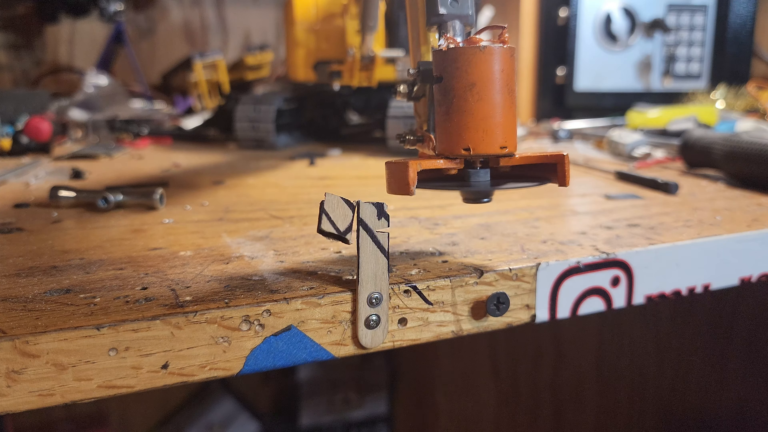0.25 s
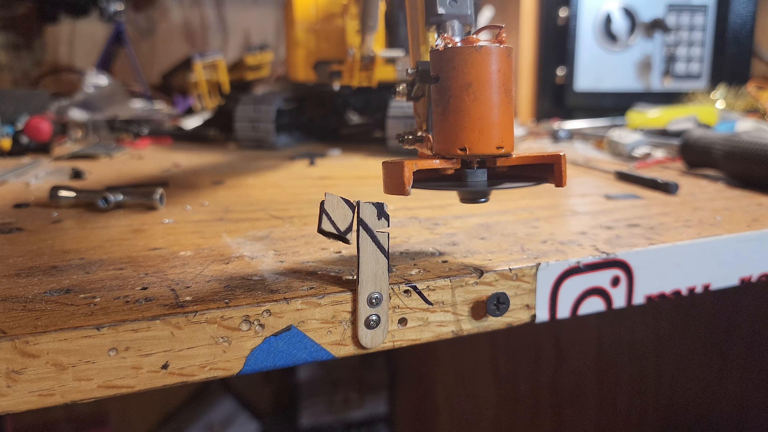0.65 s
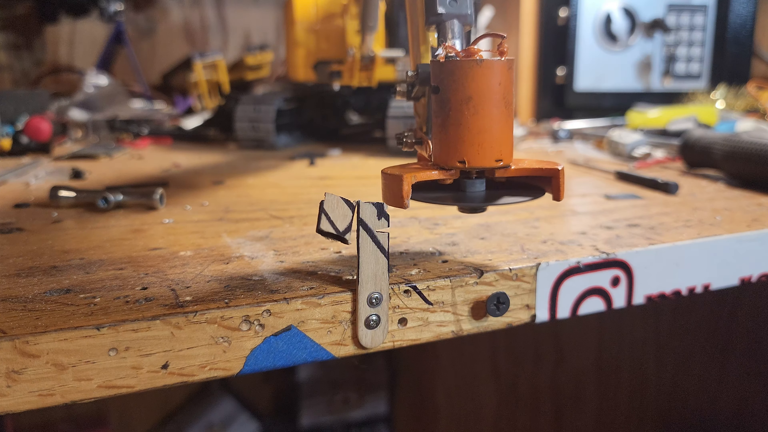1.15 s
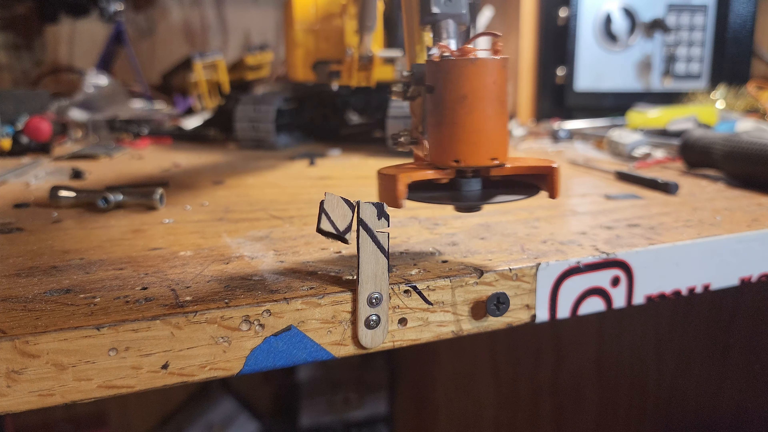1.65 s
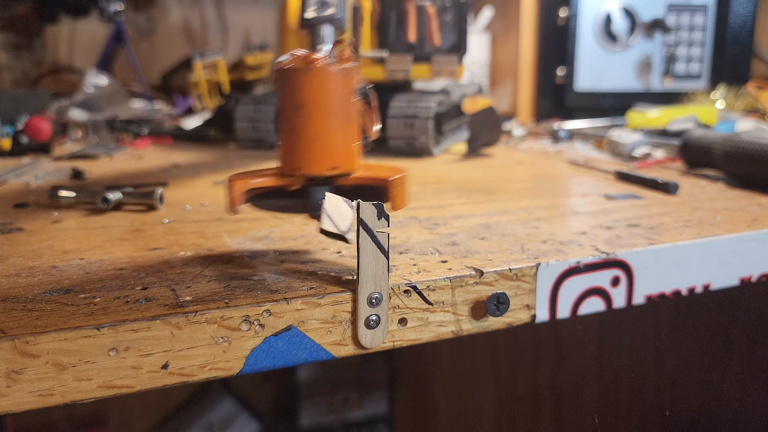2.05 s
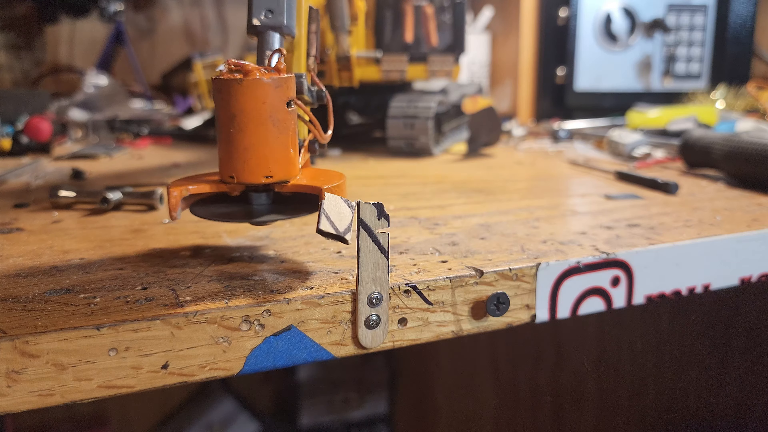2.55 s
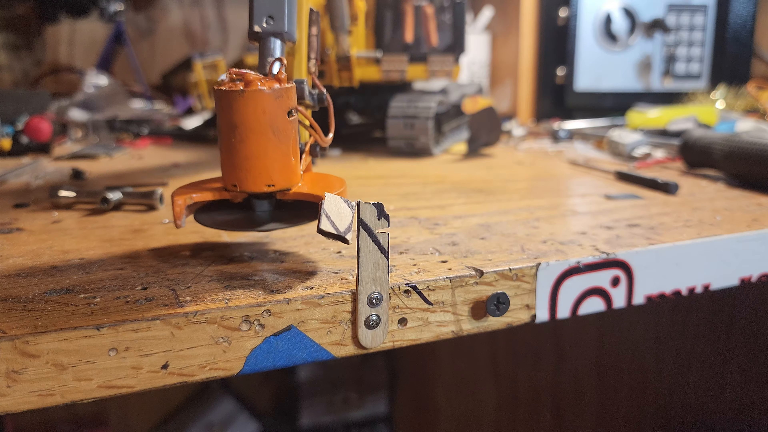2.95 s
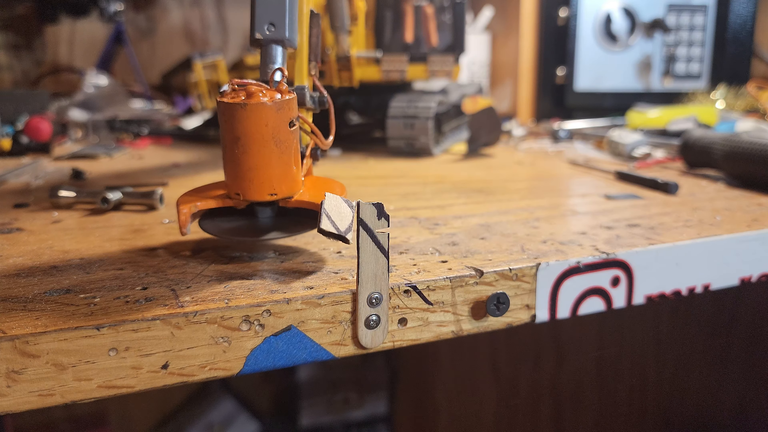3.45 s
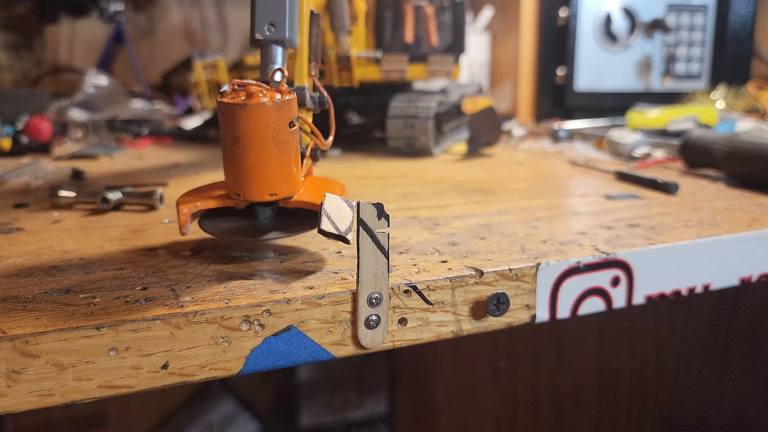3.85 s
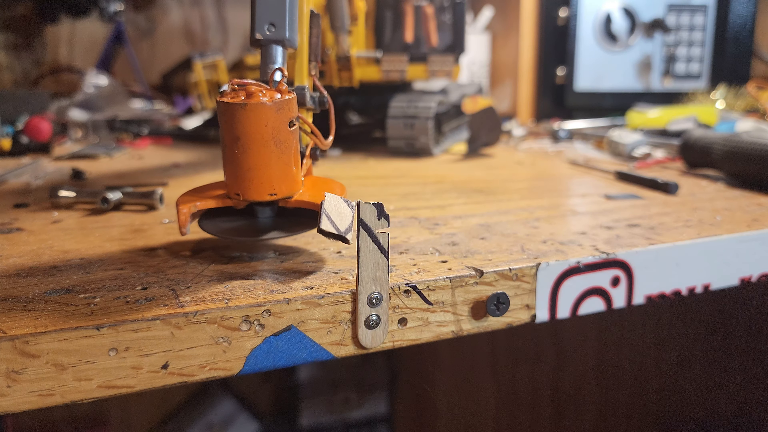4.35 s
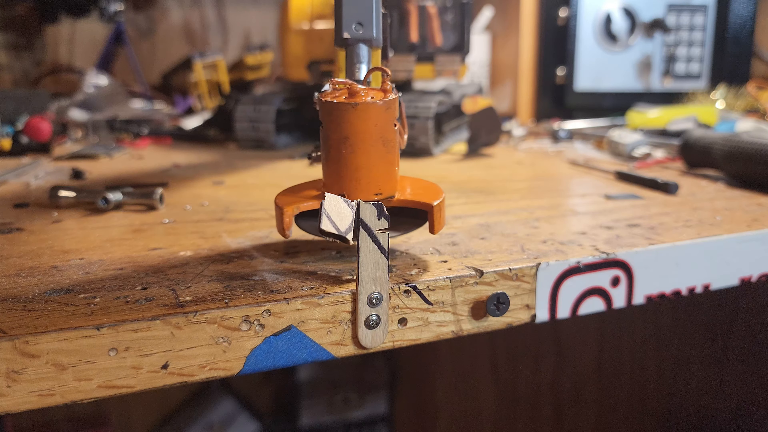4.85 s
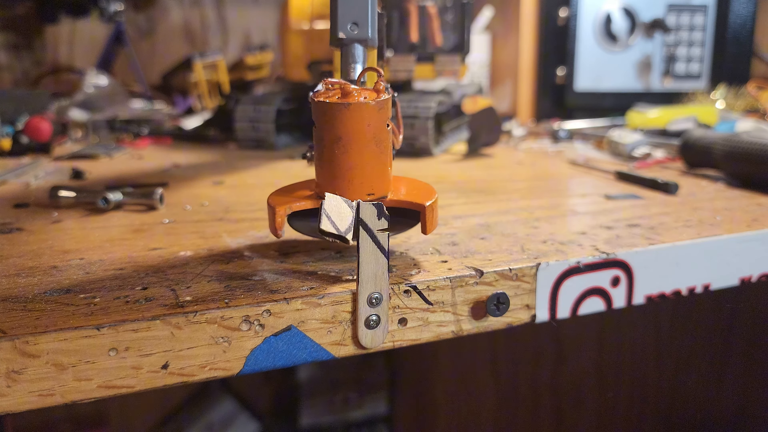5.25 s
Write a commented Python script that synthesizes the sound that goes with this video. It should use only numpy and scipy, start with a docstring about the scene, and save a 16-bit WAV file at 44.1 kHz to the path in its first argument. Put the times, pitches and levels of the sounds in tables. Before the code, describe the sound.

A small electric motor spins up to a high, hissing whine, its disc briefly squeals and judders against wood, then it runs on.

```python
"""First come tiny ticks and chirps, then a rising whine: a small electric motor spins up a cutting disc
on a toy arm above a wooden bench. Its wobbling shaft whines and its brushes (sliding contacts) hiss.
Near 2 s the disc grazes a wooden stick, which squeals once a turn and then shudders. The motor recovers
and runs on while the arm swings about, so whine and hiss change colour. A workshop rumbles below."""
import sys
import numpy as np
from scipy import signal
from scipy.fft import rfft, irfft, next_fast_len
from scipy.io import wavfile

SR = 44100
rng = np.random.default_rng(int(sys.argv[2]) if len(sys.argv) > 2 else 0)


def wrap_up_sound(samples):
    """Save the sound to the file named by the first command line argument, as 16-bit audio."""
    columns = np.atleast_2d(samples).T
    # keep every value between -1 and 1, then stretch to whole-number steps
    tamed = np.clip(columns, -1, 1)
    steps = np.round(tamed * 32767).astype(np.int16)
    wavfile.write(sys.argv[1], SR, steps)


N = 242991
TIME = np.arange(N) / SR


def amp(db):
    """Turn decibels into a gain."""
    return 10 ** (np.asarray(db) / 20)


def rms_one(x):
    """Scale a signal to an average power of 1."""
    return x / np.sqrt(np.mean(x ** 2) + 1e-20)


def in_time(rows):
    """Join a table's rows into curves over time, one for each column."""
    times, *columns = np.transpose(rows)
    return [np.interp(TIME, times, column) for column in columns]


def at_hz(rows, hz, *outside):
    """Read a table's columns at the given frequencies, joining the rows on a pitch scale."""
    points_hz, *columns = np.transpose(rows)
    return [np.interp(np.log(hz + 1), np.log(points_hz), column, *outside) for column in columns]


def sides(pan_db):
    """Left and right gains that keep the total power; positive is to the left."""
    gains = amp(np.array([pan_db / 2, -pan_db / 2]))
    return gains / np.sqrt(np.mean(gains ** 2, axis=0))


def drift(rate_hz):
    """A smooth random wobble, about 1 in size."""
    pole = np.exp(-80 * np.pi * rate_hz / SR)
    slow = signal.lfilter([1], [1, -2 * pole, pole * pole], rng.standard_normal(N // 40 + 2002))[2000:]
    return np.interp(np.arange(N) / 40, np.arange(len(slow)), rms_one(slow - slow.mean()))


def bell(x, centre, width):
    """A smooth bump of height 1."""
    return np.exp(-((x - centre) / width) ** 2)


def since(start_s):
    """Seconds gone by since a moment; 0 before it."""
    return np.maximum(TIME - start_s, 0)


def held(start_s, end_s, rise_db_per_s, fall_db_per_s):
    """A level that stays at 0 dB between two times and slopes away on both sides."""
    early_s = np.maximum(start_s - TIME, 0)
    return np.maximum(-rise_db_per_s * early_s - fall_db_per_s * since(end_s), -150)


def resonate(x, modes):
    """Let a signal ring an object's natural tones, added with alternating signs."""
    out = 0
    for k, (hz, width_hz, level_db) in enumerate(modes):
        pole = np.exp(-np.pi * width_hz / SR)
        feedback = [1, -2 * pole * np.cos(2 * np.pi * hz / SR), pole * pole]
        ring = signal.lfilter(np.array([1, 0, -1]) * (1 - pole * pole) / 2, feedback, x + 1e-18)
        out = out + (-1) ** k * amp(level_db) * ring
    return out


# Where the arm is: t/s, swung left/0-1, raised/0-1, drawn back/0-1
ARM_POSITION = [(0, 0, 0.51, 0.15), (1.65, 0.19, 0, 0.35), (2.2, 0.72, 0.61, 0.4), (2.6, 1, 1, 0.14),
                (3.2, 0.93, 0, 0.1), (4.55, 0.85, 0, 0.062), (4.9, 0.74, 0.34, 0.58), (5.51, 0.82, 0, 0.96)]
# How noise reaches the two sides: f/Hz, likeness/0-1, left's lead with arm right/rad, with arm left/rad
STEREO_LIKENESS = [(60, .96, 0, 0), (130, .88, 0, 0), (300, .7, .1, .1), (500, .55, .3, .8),
                   (860, .65, .8, 1.1), (1380, .5, .3, .6), (1810, .65, 2.6, 3.1), (2250, .4, 2.2, 3),
                   (2800, .62, 2.9, 3.1), (3360, .35, 2.2, 2.8), (3800, .25, 2.2, 6.5),
                   (4300, .5, 2.5, 9.4), (5510, .3, 2.4, 14.2), (6500, .3, 2.4, 14), (7200, .35, 4, 12.4),
                   (8000, .35, 5.9, 10.7), (8600, .5, 6.8, 11.7), (9400, .3, 6.3, 12.8),
                   (10300, .3, 8.6, 15), (11500, .3, 14, 22), (13000, .25, 25, 33), (16000, .25, 42, 50)]
# Which side is louder: f/Hz, left over right/dB
STEREO_BALANCE = [(60, 0), (130, 2), (300, 2.5), (500, -8), (860, -1), (1380, -1), (1810, 2), (2700, 1),
                  (3360, -3.5), (4220, -2.5), (5510, -1.4), (6500, 0), (7700, 2), (8600, -0.5),
                  (9300, -4.5), (10300, -8.5), (11500, 1), (13000, -2.5), (16000, 5)]
def stereo_noise(spectrum=None):
    """Noise, partly alike on both sides, made ragged by many small resonances of housing and room."""
    ragged_db, ragged_rad = 3, .5
    size = next_fast_len(N)
    hz = np.arange(size // 2 + 1) * SR / size
    alike, arm_right_lead, arm_left_lead = at_hz(STEREO_LIKENESS, hz)
    pan_db, = at_hz(STEREO_BALANCE, hz)
    colour = 1 if spectrum is None else amp(at_hz(spectrum, hz, -99, -99)[0])
    level_grid_hz, phase_grid_hz = np.arange(0, SR / 2, 35), np.arange(0, SR / 2, 120)
    density = np.clip(hz / 1200, 0, 1)  # the bass has few resonances
    swing, _, back = in_time(ARM_POSITION)
    left_share = np.clip(swing - back, 0, 1)
    poses = (left_share, arm_left_lead), (1 - swing, arm_right_lead), (swing - left_share, arm_left_lead)
    left, unrelated = rfft(rng.standard_normal((2, size)))
    out = 0
    for share, lead in poses:  # the peaks shift as the arm moves from pose to pose
        scatter = np.interp(hz, phase_grid_hz, rng.standard_normal(len(phase_grid_hz)))
        lead = lead + ragged_rad * density * scatter
        right = alike * left * np.exp(-1j * lead) + np.sqrt(1 - alike ** 2) * unrelated
        bumps = rng.standard_normal((2, len(level_grid_hz)))
        ragged = amp([ragged_db * density * np.interp(hz, level_grid_hz, row) for row in bumps])
        out = out + share * irfft(colour * sides(pan_db) * ragged * np.array([left, right]), size)[:, :N]
    return rms_one(out)


# Tone colour of the workshop: f/Hz, relative level/dB
RUMBLE_COLOUR = [(20, -2), (45, -19), (60, 3), (80, -11), (111, -1), (135, -6.5), (175, -17.5), (265, -21),
                 (330, -18.5), (400, -20), (520, -35)]
# Its loudness: t/s, level/dB
RUMBLE_LEVEL = [(0, -75), (0.15, -57), (0.9, -47), (1.84, -47.5), (2.3, -54.5), (4.6, -55), (5.51, -53)]
def rumble():
    """Low workshop noise, a little lumpy."""
    level_db, = in_time(RUMBLE_LEVEL)
    return amp(level_db + 2.4 * drift(7)) * stereo_noise(RUMBLE_COLOUR)


def rattle(x):
    """Loose parts rattle, so narrow bands of the whirr swell and sink on their own."""
    width_hz, depth_db = 200, 1.8
    size = next_fast_len(N)
    hz = np.arange(size // 2 + 1) * SR / size
    spectrum, out = rfft(x, size), x
    for centre_hz in np.arange(1200, 6000, width_hz):
        window = np.clip(1 - np.abs(hz - centre_hz) / width_hz, 0, 1)
        band = irfft(spectrum * window, size)[:, :N]
        out = out + band * (amp(depth_db * drift(16)) - 1)
    return out


# Loudness of the hiss: t/s, brush level/dB, motor case's lower ring against the brushes/dB
HISS_LEVEL = [(0, -66, -11), (0.04, -50.5, 0), (0.1, -44.5, 2), (0.25, -39.5, -13), (0.33, -32, -6),
              (0.38, -33.5, -6), (0.43, -40, -3), (0.55, -34.5, -8), (0.75, -30, -0.5), (1.15, -26.5, -2.5),
              (1.84, -25.5, -2.5), (2.1, -29, 0), (2.16, -30, -3), (2.24, -26.5, -4.5), (2.7, -27, -3.5),
              (3, -27.5, -1), (3.35, -25.5, 0.3), (4.2, -26.5, 1), (4.58, -26, 1), (4.8, -28, 0),
              (5.15, -26, 0.5), (5.51, -26, 1)]
# Tone colours of rubbing brushes, buzzing plastic arm and the disc's wind: f/Hz, relative level/dB
BRUSH_COLOUR = [(1530, -17), (2600, -6.5), (2850, -7), (3160, 1.5), (3400, -1), (3980, -0.5), (4300, -0.5),
                (4550, 0.5), (4750, -1), (5200, -1.5), (5400, 1.5), (5600, -1), (5990, 0), (7200, -2),
                (9360, -6.5), (15800, -120)]
ARM_COLOUR = [(400, -8), (470, -9), (494, -2.5), (515, -14.5), (562, -36), (610, -13), (700, -11.5),
              (850, -5.5), (1150, -7.5), (1250, -6), (1310, -5), (1500, -6.5), (1650, -6), (1850, -8),
              (2200, -2), (2400, -2), (2750, -8), (3200, -22)]
WIND_COLOUR = [(8600, -6.5), (9300, -4.5), (9800, -8), (10300, -4.5), (11000, -7), (11800, -2),
               (13000, -3.5), (15000, -5.5), (16200, -4)]
# The two rings of the motor case: f/Hz, width/Hz
CASE_RINGS = [(7650, 730), (8650, 770)]
def hiss(angle):
    """Brushes rub, the arm buzzes, the disc stirs air and the case rings; all throb with each turn."""
    brush_db, low_ring_db = in_time(HISS_LEVEL)
    swing, _, _ = in_time(ARM_POSITION)
    change_db = brush_db + 26  # the other layers follow the brushes, which run at about -26 dB
    arm_db = -36 + .63 * change_db - .5 * swing + 1.5 * drift(1.2)
    wind_db = -24 + 1.35 * change_db - .93 * drift(1.2)
    high_ring_db = -26.5 + change_db - 2 * swing + .3 * drift(1.2)
    throb = 1 + .027 * np.cos(angle) + .018 * np.cos(2 * angle)
    flutter_db = .7 * drift(21) + .4 * drift(5.3)
    brushes = amp(brush_db) * stereo_noise(BRUSH_COLOUR)
    arm = amp(arm_db) * stereo_noise(ARM_COLOUR)
    out = rattle(brushes + arm) + amp(wind_db) * stereo_noise(WIND_COLOUR)
    for (hz, width_hz), level_db in zip(CASE_RINGS, (brush_db + low_ring_db, high_ring_db)):
        ring = resonate(stereo_noise(), [(hz, width_hz, 0)])
        ring = resonate(ring, [(hz, 7.3 * width_hz, 0)])  # trims noise far from the ring
        out += amp(level_db + .23 * drift(60)) * rms_one(ring)
    return out * throb * amp(flutter_db) * sides(3 + 2.5 * swing)


# Echoes off the bench: left delay/s, relative level/dB, right delay/s, relative level/dB
BENCH_ECHOES = [(.0011, -3.5, .0016, 5), (.0027, 6, .0034, -23), (.0049, -4, .0058, -6),
                (.0083, -3, .0071, 4.5), (0.012, -11, .015, -40)]
def near_bench(mono, pan_db, echo_db):
    """The direct sound, a little late on the left, plus short echoes off the bench."""
    out = np.array([np.roll(mono, 4), mono])
    for left_s, left_db, right_s, right_db in BENCH_ECHOES:
        out[0] += amp(left_db + echo_db) * np.roll(mono, round(left_s * SR))
        out[1] -= amp(right_db + echo_db) * np.roll(mono, round(right_s * SR))
    return out * sides(pan_db)[:, None]


# The brushes break loose: t/s, level/dB
FIRST_TICKS = [(0.0074, -41), (0.03, -31), (0.0356, -35), (0.0558, -28), (0.067, -24), (0.082, -25)]
# Tones of the chirping case: f/Hz, width/Hz, relative level/dB
CHIRP_TONES = [(8340, 420, -8), (8600, 700, -13)]
# Brief changes in the chirps' loudness: t/s, change/dB
CHIRP_SWELLS = [(.09, 6), (.167, 2), (.317, -1), (.365, 2)]
def start_chirps(angle):
    """Brushes tick loose, then scratch over three gaps in the shaft's contact ring and ring the case."""
    level_db = -36.5 + held(.085, .39, rise_db_per_s=401, fall_db_per_s=401)
    level_db += sum(swell_db * bell(TIME, at_s, .0095) for at_s, swell_db in CHIRP_SWELLS)
    gaps = (.5 + .5 * np.cos(3 * angle)) ** 2.5
    chirps = amp(level_db) * rms_one(resonate(gaps * rng.standard_normal(N), CHIRP_TONES))
    tick_level = sum(amp(peak_db) * bell(TIME, at_s + .002, .0011) for at_s, peak_db in FIRST_TICKS)
    ticks = tick_level * np.sin(2 * np.pi * CHIRP_TONES[0][0] * TIME)
    return near_bench(chirps + ticks, pan_db=2.5, echo_db=-9)


# The stick jolts against disc and bench: t/s, tearing/dB, thud/dB, knock/dB, length/s
JOLTS = [(1.972, -21, -50, -24, 0.018), (1.987, -16, -38, -22, 0.018), (2.004, -15.5, -42, -24, 0.017),
         (2.013, -30, -31, -40, 0.012), (2.024, -16, -38, -21.5, 0.018), (2.042, -15, -31, -27, 0.016),
         (2.054, -22, -31, -35, 0.014), (2.067, -21, -36, -27, .018), (2.09, -29.5, -37, -45, 0.035)]
TEARING_COLUMN, THUD_COLUMN, KNOCK_COLUMN = 1, 2, 3
def jolts(column, length_share):
    """One bump of loudness for each jolt of the stick."""
    return sum(amp(row[column]) * bell(TIME, row[0], length_share * row[-1]) for row in JOLTS)


# Tone colour of tearing wood, and the bench's low tones: f/Hz, relative level/dB
TEARING_COLOUR = [(150, -40), (250, -46), (330, -1), (420, -31), (490, 0.5), (640, -15.5), (820, 0.5),
                  (1100, -10.5), (1340, -11.5), (1800, -3), (2300, -3.5), (3000, -7.5), (4400, -11),
                  (4900, -9.5), (5800, -4), (6800, -19), (8800, -10), (10300, -15), (15500, -16)]
BENCH_TONES = [(58, -4), (108, -6.5)]
def shudder(angle):
    """Each jolt tears wood fibres in a short burst, chopped by the turning disc, and thumps the bench."""
    bench = sum(amp(level_db) * np.sqrt(2) * np.sin(2 * np.pi * (hz * TIME + rng.random()))
                for hz, level_db in BENCH_TONES)
    chop = (1 + .45 * np.cos(angle)) * amp(2 * drift(150))
    tearing = jolts(TEARING_COLUMN, length_share=.42) * chop * stereo_noise(TEARING_COLOUR)
    thuds = jolts(THUD_COLUMN, length_share=1) * bench
    return tearing * sides(1)[:, None] + thuds * [[1.1], [.9]]


# The disc bites the stick: t/s, hold/s, low squeal/dB, high squeal/dB, knock/dB
BITES = [(1.860, .004, -27, -33, -45), (1.868, 0.024, -20.5, -29, -42), (1.901, .007, -22, -27, -38),
         (1.912, 0.019, -21.5, -18, -33), (1.942, 0.006, -28, -19.5, -29), (1.955, .011, -28, -29, -27)]
# Tones of the disc, the disc cutting deeper, and the stick: f/Hz, width/Hz, relative level/dB
LOW_SQUEAL = [(3910, 420, -4), (4960, 760, 2), (5830, 150, 7), (6300, 370, 2), (7130, 230, 6)]
HIGH_SQUEAL = [(5200, 460, 15), (7380, 470, 15), (7800, 550, 15.5), (9000, 360, 13.5), (9165, 360, 14),
               (13700, 320, 3)]
STICK_KNOCK = [(930, 130, 6), (1220, 200, 11), (1780, 460, 8), (2050, 120, 5)]
def graze(angle):
    """A high spot on the disc hits the stick once a turn, setting both ringing."""
    new_turn = np.diff(np.floor(angle / (2 * np.pi)), prepend=0) > 0
    hits = new_turn * amp(1.8 * rng.standard_normal(N))
    hits = signal.sosfilt(signal.butter(3, 700, "high", fs=SR, output="sos"), hits)  # thin stick: no bass
    bites = np.array([amp(held(at_s, at_s + hold_s, rise_db_per_s=2400, fall_db_per_s=2200))
                      for at_s, hold_s, *_ in BITES])
    low, high, knock = amp(np.transpose(BITES)[2:]) @ bites
    knock += jolts(KNOCK_COLUMN, length_share=.3)
    low += amp(-12) * jolts(TEARING_COLUMN, length_share=.3)  # the disc still squeals at each jolt
    rings = sum(level * rms_one(resonate(hits, tones))
                for level, tones in ((low, LOW_SQUEAL), (high, HIGH_SQUEAL), (knock, STICK_KNOCK)))
    return near_bench(rings, pan_db=9.5, echo_db=-2.5)


# A quick and a slow approach to full speed: speed missing as the soft start ends/Hz, settling time/s
SETTLING = [(80, .135), (111.5, .288)]
FULL_SPEED_HZ = 450.8
def shaft_speed():
    """Turns per second: the motor starts softly, settles, is dragged down by the cut and recovers."""
    soft_start_s, cut_start_s, cut_end_s = .3, 1.845, 2.09
    drag_hz, drag_s, recover_s = 12.6, .04, .27
    ramp_left_s = np.maximum(soft_start_s - TIME, 0)
    ramp_hz = 1196 * ramp_left_s - 960 * ramp_left_s ** 2
    settling_hz = sum(hz * np.exp(-since(soft_start_s) / settle_s) for hz, settle_s in SETTLING)
    drag = (1 - np.exp(-since(cut_start_s) / drag_s)) * np.exp(-since(cut_end_s) / recover_s)
    sag_hz = bell(TIME, 4.75, .4)  # a slight slowing as the arm swings back
    return np.maximum(FULL_SPEED_HZ - ramp_hz - settling_hz - drag_hz * drag - sag_hz, 1)


# Pitches that arm and room strengthen: f/Hz, width/Hz, left level/dB, right level/dB
ROOM_PEAKS = [(113, 30, -35, -33), (236, 25, -39, -41), (326, 28, -34.5, -39), (383, 8, -55, -42.5),
              (564, 110, -43, -43), (705, 150, -48.5, -43.5), (435, 16, -42, -41), (450.8, 6.3, -37, -38),
              (795, 17, -35.5, -32.5), (920, 28, -59, -53), (968, 9.1, -48, -50.5), (976, 39, -35.5, -38),
              (1256, 17, -32, -43), (1360.4, 19.3, -25.5, -28), (1405, 33, -33, -46), (1570, 45, -36, -41),
              (1980, 46, -38, -37), (2150, 50, -27.5, -37), (2197, 23, -27, -32), (2235, 26, -29.5, -67),
              (2930, 500, -36.5, -42), (3290, 120, -35.5, -40), (3360, 51, -35, -59), (3800, 30, -44, -44),
              (4150, 170, -47, -48), (4900, 500, -35, -52), (5394, 20, -39, -31.5), (5460, 150, -49, -32)]
# Pitches where sound paths cancel: f/Hz, width/Hz, change/dB
ROOM_DIPS = [(290, 22, -15), (360, 24, -14), (393, 6, -14), (690, 40, -6), (890, 12, -10), (1060, 45, -10),
             (1215, 16, -12), (1500, 40, -10), (1730, 50, -8)]
def tone_db(harmonic, speed):
    """Left and right level of a tone as it slides through the peaks and dips of arm and room."""
    floor_db, db_per_octave = -68, 17
    grid_hz = np.arange(6000.)
    peak_hz, width_hz, *sides_db = np.transpose(ROOM_PEAKS)
    peaks = 1 / (1 + (2 * (grid_hz[:, None] - peak_hz) / width_hz) ** 2)
    paths_db = [10 * np.log10(amp(2 * floor_db) + peaks @ amp(2 * side_db)) for side_db in sides_db]
    dips_db = sum(depth_db * bell(grid_hz, hz, wide_hz) for hz, wide_hz, depth_db in ROOM_DIPS)
    force_db = db_per_octave * np.log2(speed / FULL_SPEED_HZ)  # a faster shaft shakes harder
    return np.array([np.interp(harmonic * speed, grid_hz, db + dips_db) for db in paths_db]) + force_db


# The whine's low tones: harmonic, left's lead/rad, extra lead/rad when (swung left, back, speeding up)
LOW_TONES = [(1, 0, 0, 0, 0), (2, 1.4, .3, 0, -1.2), (3, -.2, 1.1, -1.1, -.7), (5, 5.4, -2.75, -.4, -4),
             (4, 2.9, 0, 0, -.8)]
# Their level changes/dB: swung left (left side, right side), in the wood, at standstill, raised, back
LOW_CHANGES = [(1.5, 0.8, -9, 18, 0, -.5), (8, 5, -16, -30, 2.5, 0), (-2.5, -11, 3, 13, 1, 1),
               (2.5, 9.5, -10, -9, 2.5, -2.5), (0, 9.5, 5, -26, -4, 3)]
# Their fast wobble: share of each tone's height
LOW_ROUGHNESS = [0.19, 0.11, 0.25, 0.15, .3]
def low_whine(angle, missing_hz, speed, sputter):
    """The off-balance shaft and its contacts shake every turn: harmonics, multiples of its speed."""
    swing, raised, back = in_time(ARM_POSITION)
    in_wood = amp(held(1.885, 2.07, rise_db_per_s=870, fall_db_per_s=260))  # wood damps the disc
    glide = (1 - swing) * (1 - np.exp(-missing_hz / 7))
    out = np.zeros((2, N))
    for tone, changes, roughness in zip(LOW_TONES, LOW_CHANGES, LOW_ROUGHNESS):
        harmonic, lead, swung_lead, back_lead, glide_lead = tone
        left_db, right_db, wood_db, slow_db, raised_db, back_db = changes
        lead = lead + glide_lead * glide + swung_lead * swing + back_lead * back
        wave = np.sqrt(2) * np.sin(harmonic * angle + lead / 2 * [[1], [-1]])
        flutter_db = drift(13) + 1.5 * sputter * np.array([drift(22), drift(22)]) + .71 * drift(3.6)
        pose_db = swing * [[left_db], [right_db]] + raised_db * raised + back_db * back
        running_db = tone_db(harmonic, speed) + wood_db * in_wood + slow_db * missing_hz / FULL_SPEED_HZ
        rough = 1 + roughness * np.array([drift(36), drift(27)])
        out += amp(running_db + pose_db + flutter_db) * rough * wave
    return out


# Thin tones that follow the brush hiss: harmonic
THIN_TONES = [6, 11, 15, 16, 17, 18, 19, 20]
# For each: level against the brushes/dB, left over right/dB, change when drawn back/dB
THIN_LEVELS = [(-21.5, 5, 2), (-16, 8, -2), (-15.5, 4, 0), (-17, 4, 0), (-9, 12, -4), (-15, 5, 0),
               (-7.5, 4, -2), (-13.5, 1, 0)]
# Middle tones: harmonic, left's lead/rad, extra lead/rad when (swung left, back), change speeding up/dB
MIDDLE_TONES = [(7, 1.2, -2, -2, -5), (8, 1.7, 1.4, 0, -5), (9, 2.8, -2.4, 1, 0), (12, 2.2, -.6, -1.3, 0)]
# For each: relative level/dB, changes/dB: swung left (left side, right side), raised, back (left side)
MIDDLE_LEVELS = [(-0.5, 0, -5, -2, -1), (0.5, 7.5, -8, 3.5, 2), (5.5, -9, 3, 3.5, 7), (-8.5, 6, 4, 0, 9)]
def high_whine(angle, missing_hz, speed, sputter):
    """Higher harmonics of the same shaking; each side wavers on its own, as its room path differs."""
    swing, raised, back = in_time(ARM_POSITION)
    thin_db = in_time(HISS_LEVEL)[0] - .12 * missing_hz  # thin tones emerge only near full speed
    tones = []
    for harmonic, (level_db, pan_db, back_db) in zip(THIN_TONES, THIN_LEVELS):
        gains = amp(thin_db + level_db + back_db * back) * sides(pan_db)[:, None]
        tones.append((harmonic, 2.6 * drift(3.8), gains))
    for tone, levels in zip(MIDDLE_TONES, MIDDLE_LEVELS):
        harmonic, lead, swung_lead, back_lead, glide_db = tone
        level_db, left_db, right_db, raised_db, back_db = levels
        lead = lead + swung_lead * swing + back_lead * back + .5 * drift(5)
        pose_db = swing * [[left_db], [right_db]] + raised_db * raised + back * [[back_db], [0]]
        gains = amp(tone_db(harmonic, speed) + level_db + glide_db * sputter + pose_db)
        tones.append((harmonic, lead, gains))
    out = np.zeros((2, N))
    for harmonic, lead, gains in tones:
        phase = harmonic * angle + (.7 + sputter) * drift(7)
        for side, gain in enumerate(gains):
            waver_db = (2.5 - sputter) * drift(16) + 3 * sputter * drift(45)
            out[side] += gain * amp(waver_db) * np.sin(phase - side * lead)
    return out


def scene():
    """One turning shaft drives all the motor and cutting sounds, over the workshop rumble."""
    speed = shaft_speed()
    angle = 2 * np.pi * np.cumsum(speed + .25 * drift(8)) / SR
    missing_hz = FULL_SPEED_HZ - speed
    sputter = np.clip(missing_hz / 60, 0, 1)  # gliding tones flicker through the room's peaks and dips
    whine = low_whine(angle, missing_hz, speed, sputter) + high_whine(angle, missing_hz, speed, sputter)
    return whine + hiss(angle) + start_chirps(angle) + graze(angle) + shudder(angle) + rumble()


def record(dry):
    """Round off the loudest peaks and cut the highest treble steeply."""
    ceiling, cutoff_hz = .8, 15740
    rounded = ceiling * np.tanh(dry / ceiling)
    return signal.sosfilt(signal.ellip(12, .5, 80, cutoff_hz, fs=SR, output="sos"), rounded)


dry = scene()
out = record(dry)
wrap_up_sound(out)
```